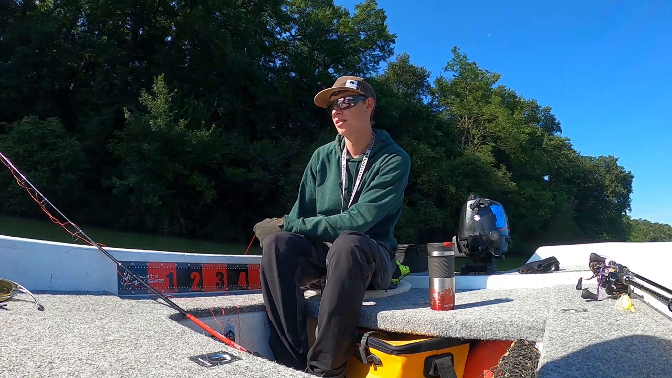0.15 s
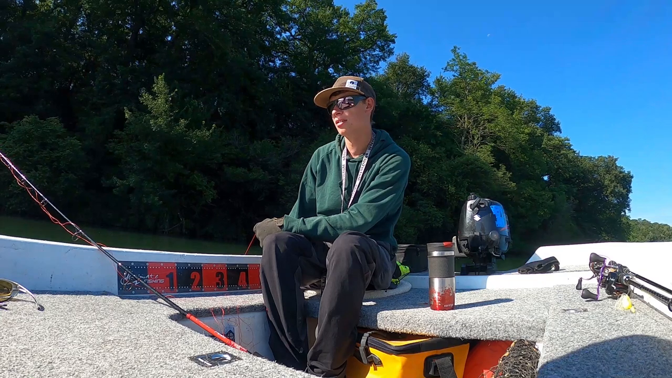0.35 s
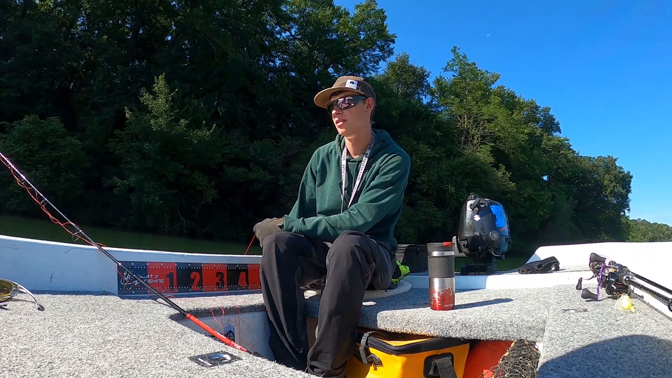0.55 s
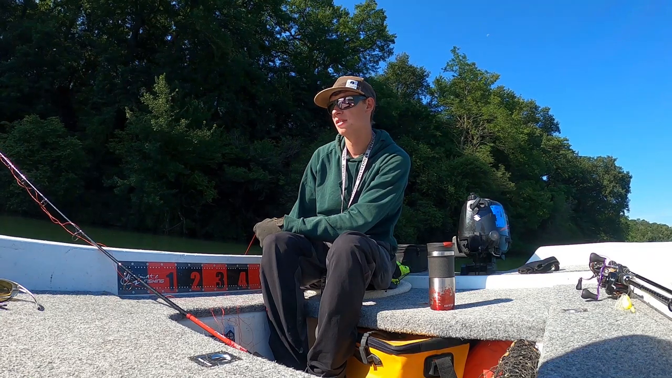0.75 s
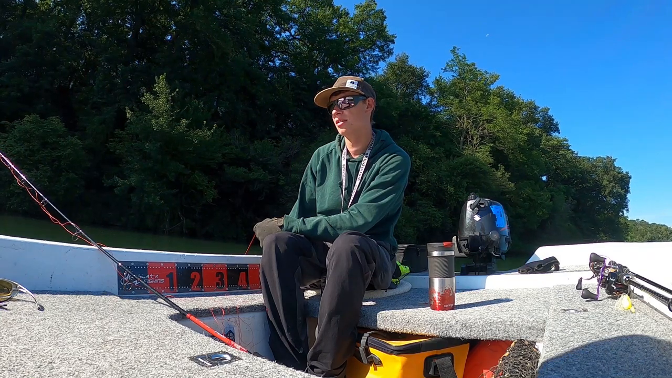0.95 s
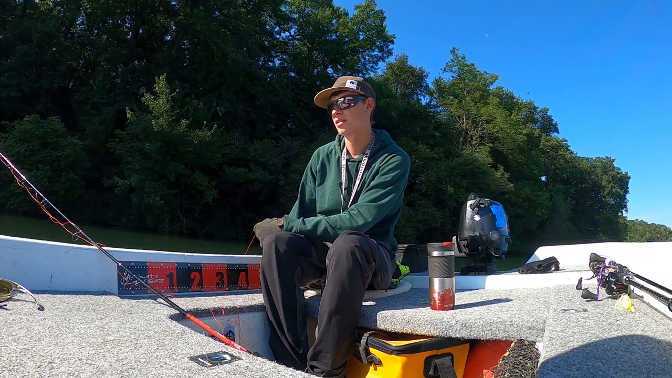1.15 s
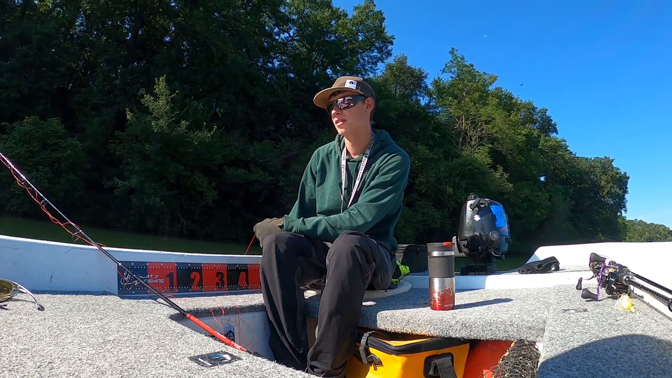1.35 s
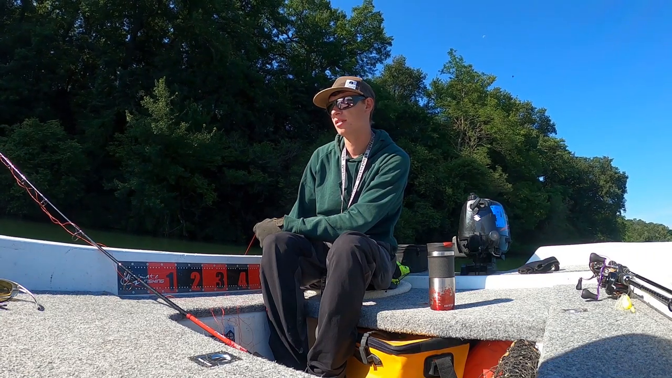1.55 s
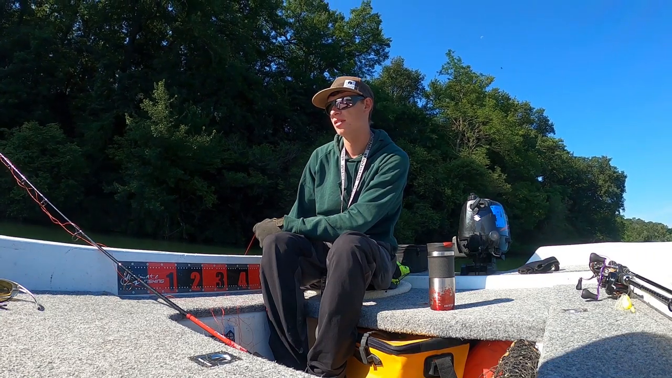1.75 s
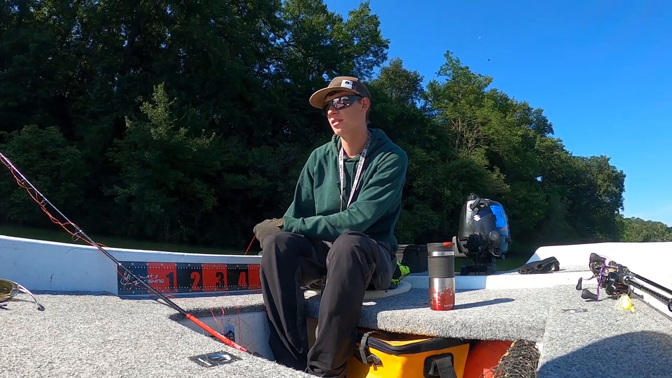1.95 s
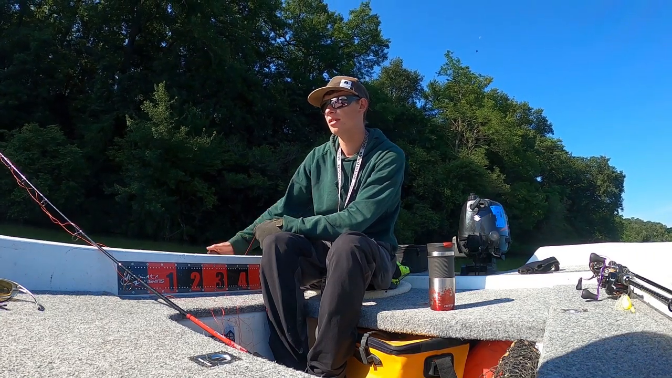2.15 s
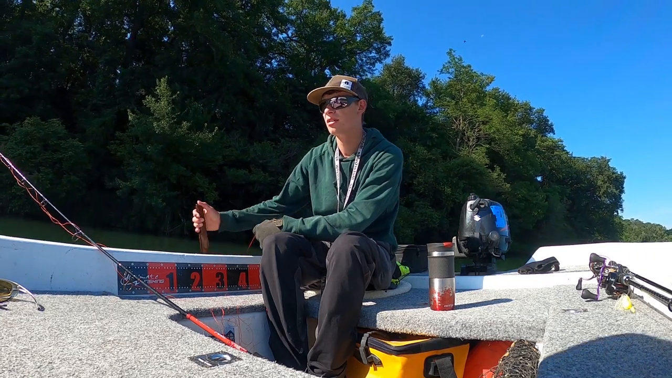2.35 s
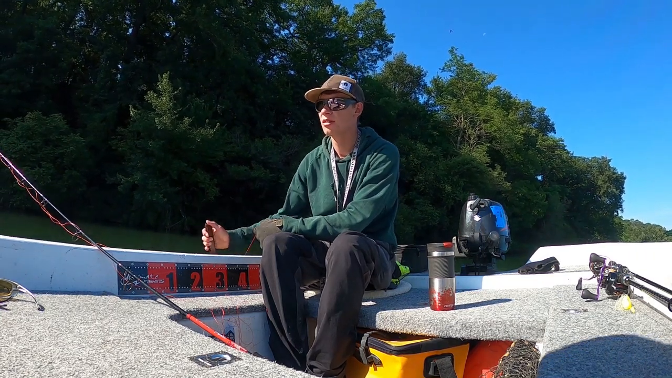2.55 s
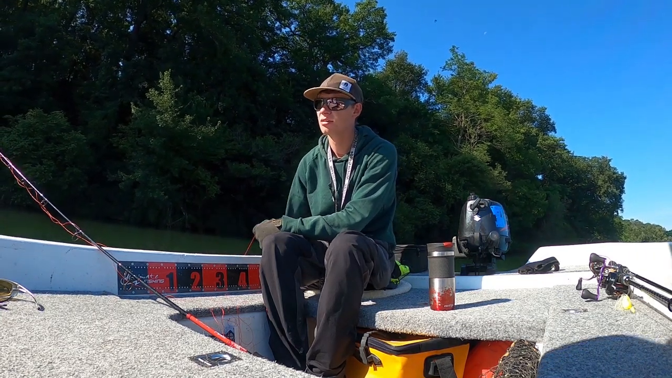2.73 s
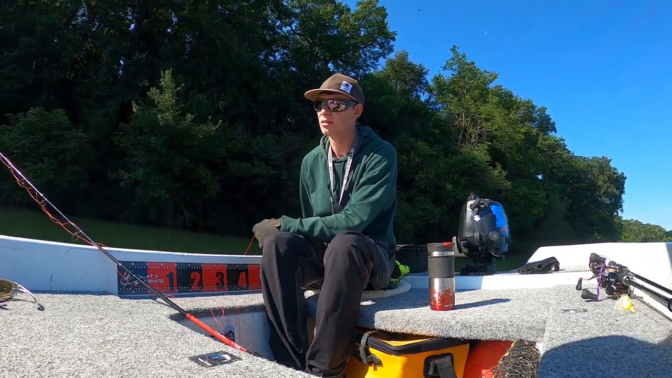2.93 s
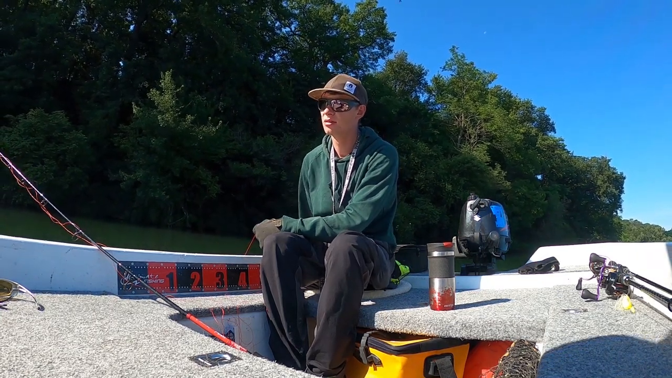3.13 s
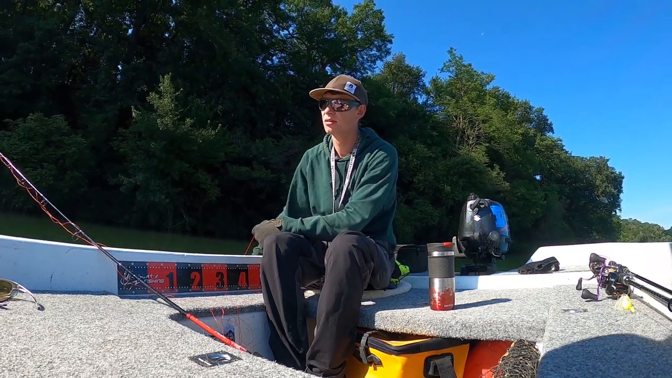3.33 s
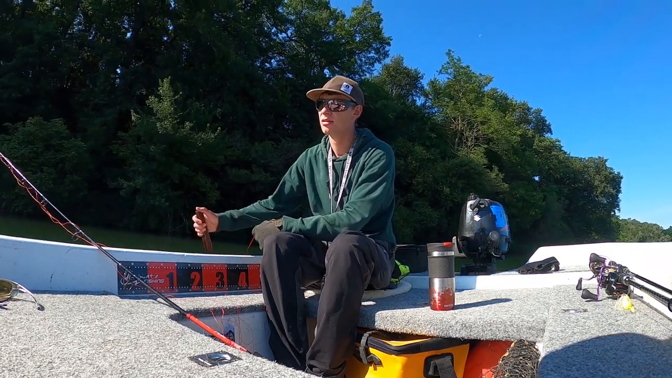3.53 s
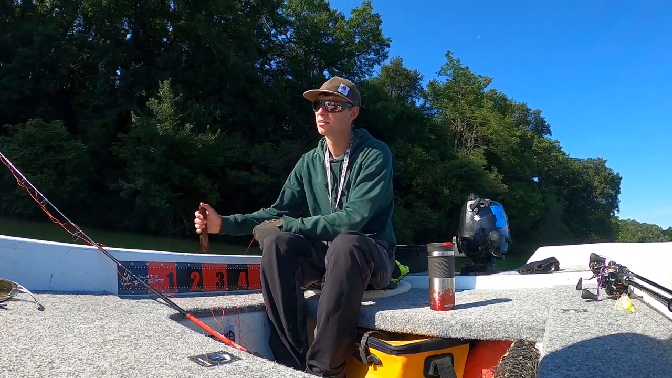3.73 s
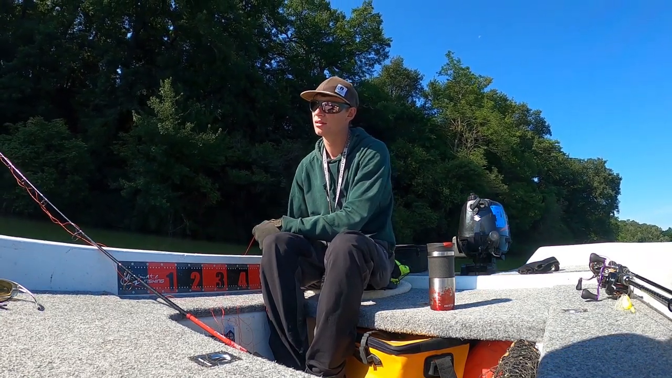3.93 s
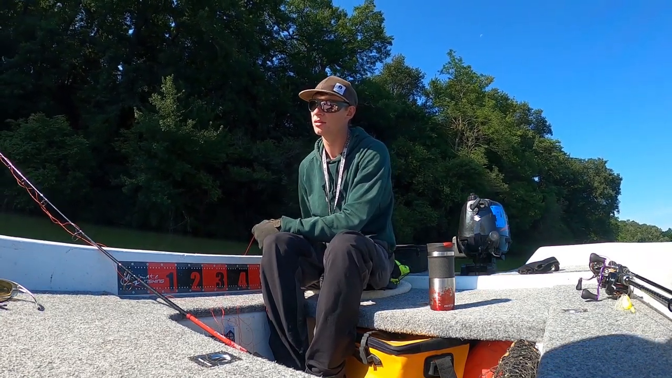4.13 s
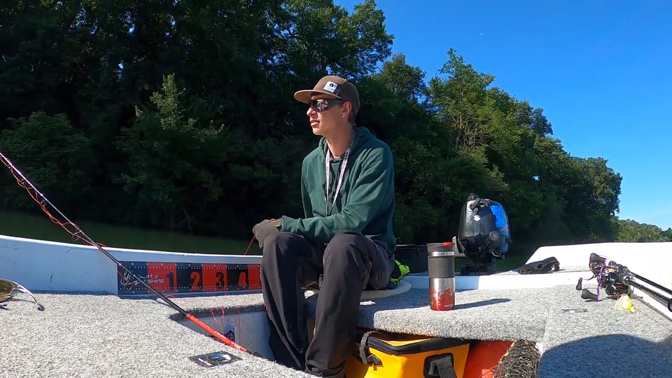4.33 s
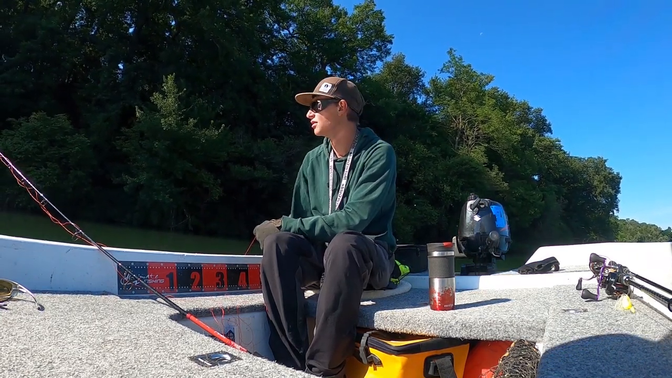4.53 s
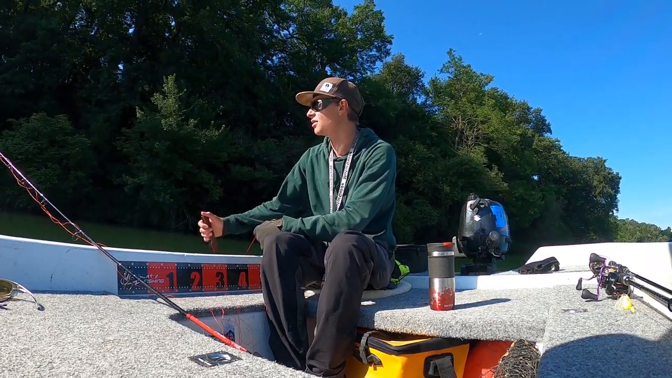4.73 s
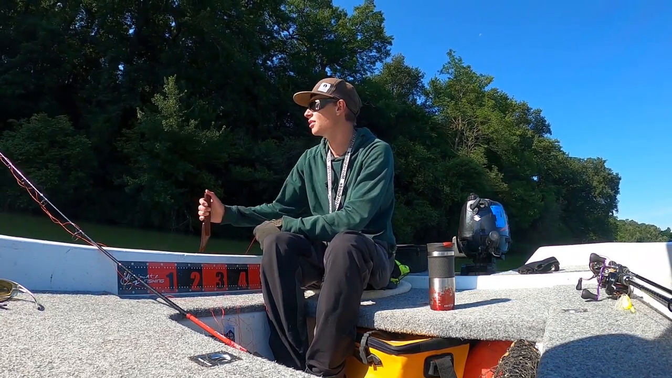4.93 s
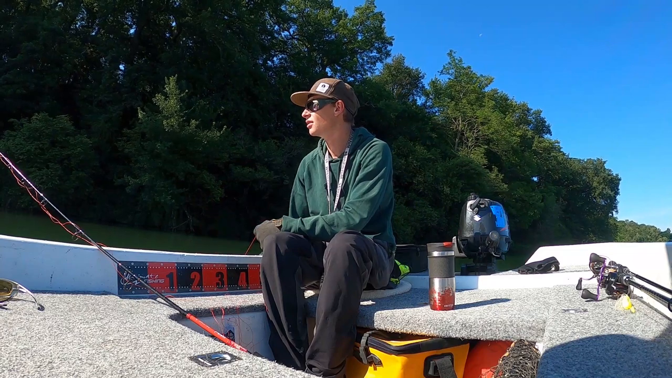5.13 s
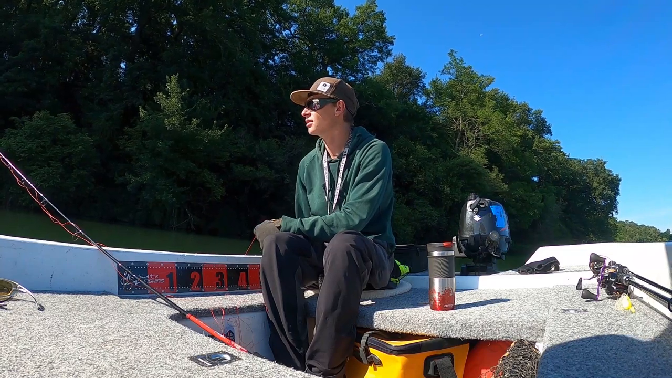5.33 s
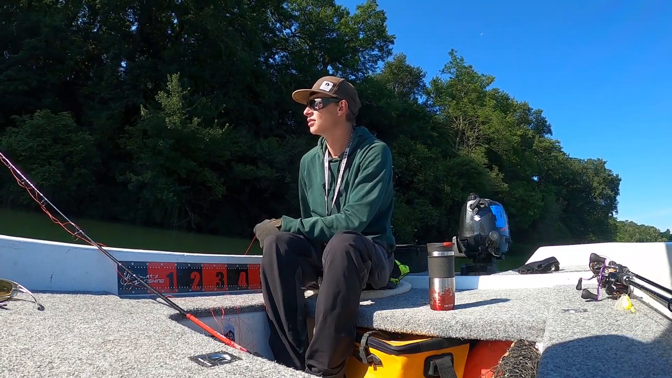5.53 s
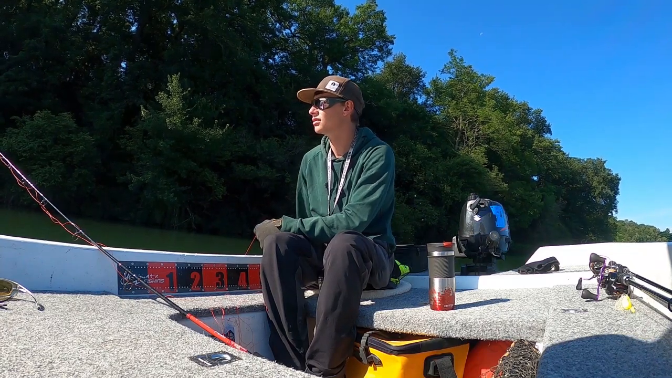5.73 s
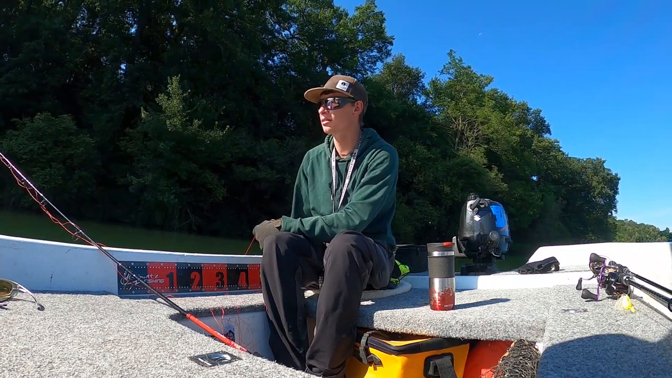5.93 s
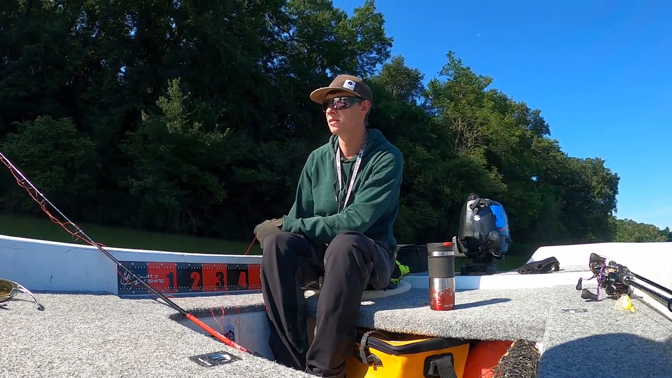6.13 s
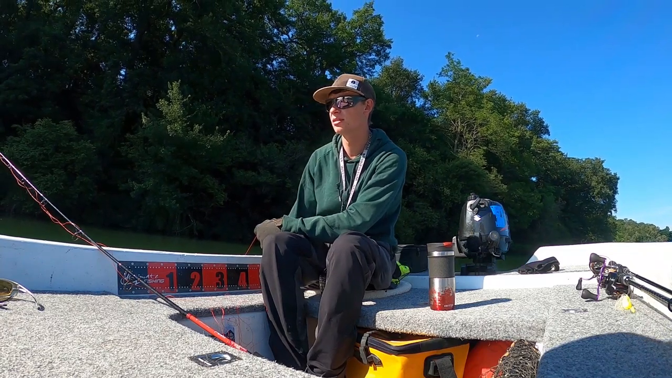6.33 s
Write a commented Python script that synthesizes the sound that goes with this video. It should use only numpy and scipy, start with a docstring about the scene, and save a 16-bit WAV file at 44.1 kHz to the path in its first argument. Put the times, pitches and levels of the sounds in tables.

```python
"""A wooden clonk, a stick that plops in water, is plunged three times into a calm river from a boat.
Each stroke splashes, drags down a throbbing pocket of air and pinches it off with a deep rising plop;
then the water falls back in gurgles and drops, and the wooded bank echoes.
Before that, the clonk bumps the boat and a sleeve swishes as the arm reaches out.
Small birds call over a low outdoor rumble."""
import sys
import numpy as np
from scipy import signal
from scipy.fft import rfft, irfft, next_fast_len
from scipy.io import wavfile

SR = 44100
rng = np.random.default_rng(int(sys.argv[2]) if len(sys.argv) > 2 else 0)


def output_pcm(signal):
    """Save a mono or channel-first signal as 16-bit PCM at the path in sys.argv[1].

    Samples are clipped to [-1, 1] before scaling.
    """
    pcm = np.clip(np.atleast_2d(signal).T, -1, 1) * 32767
    wavfile.write(sys.argv[1], SR, np.round(pcm).astype(np.int16))


N = 285762
TIME = np.arange(N) / SR


def from_db(db):
    """Turn decibels into a gain to multiply by."""
    return 10 ** (np.asarray(db) / 20)


def rms_one(x):
    """Scale a signal so that its average strength (rms) is 1."""
    return x / np.sqrt(np.mean(x ** 2) + 1e-20)


def at_hz(points, hz):
    """Read between the rows of a table, along a scale of octaves."""
    points = np.array(points)
    return np.interp(np.log(hz), np.log(points[:, 0]), points[:, 1])


def level(rows):
    """A gain that follows rows of time_s, level_db."""
    return from_db(np.interp(TIME, *np.transpose(rows)))


def since(s):
    """Seconds since a moment, zero before it."""
    return np.maximum(TIME - s, 0)


def dying(age, t60):
    """A fade that loses 60 dB every t60 seconds."""
    return from_db(-60 * np.minimum(age / t60, 4))


def burst(s, length, t60):
    """A quick rise, a hold and a fade."""
    return np.minimum(since(s) / 0.0013, 1) * dying(since(s + length), t60)


def swell(s, rise, length, t60):
    """A rounded rise, a hold and a fade."""
    return np.sin(np.pi / 2 * np.minimum(since(s) / rise, 1)) ** 2 * dying(since(s + length), t60)


def arch(length):
    """Progress through a note from 0 to 1, and its rounded loudness."""
    progress = np.linspace(0, 1, int(length * SR))
    return progress, np.sqrt(4 * progress * (1 - progress))


def sine(hz):
    """A pure tone that follows a pitch curve."""
    return np.sin(2 * np.pi * np.cumsum(hz) / SR)


def drift(per_s):
    """A random wander, about 1 in size."""
    knots = rng.standard_normal(int(N / SR * per_s) + 2)
    return rms_one(np.interp(TIME * per_s, np.arange(len(knots)), knots))


def clicks(per_s, size_db):
    """Random clicks of uneven size."""
    sizes = from_db(size_db * np.minimum(rng.exponential(1, N), 4)) * rng.choice([-1, 1], N)
    return sizes * (rng.random(N) < per_s / SR)


def add(out, s, sound):
    """Mix a short sound in at a moment."""
    start = max(int(s * SR), 0)
    out[..., start:start + sound.shape[-1]] += sound[..., :max(N - start, 0)]


def coloured(x, colour):
    """Give a sound a tone colour: rows of pitch_hz, relative_db. The result has rms 1."""
    size = 2 * next_fast_len(N // 2 + SR // 4)
    hz = np.maximum(np.arange(size // 2 + 1) * SR / size, 1)
    octaves_outside = abs(np.log2(hz / np.clip(hz, colour[0][0], colour[-1][0])))
    gain = from_db(at_hz(colour, hz) - np.minimum(30 * octaves_outside, 60))
    # Folding the cepstrum keeps the filter from ringing before the sound arrives.
    cepstrum = irfft(np.log(gain))
    cepstrum[1:size // 2] *= 2
    cepstrum[size // 2 + 1:] = 0
    return rms_one(irfft(rfft(x, size) * np.exp(rfft(cepstrum)))[..., :N])


def pan(left_db):
    """Two gains that make the left side left_db louder than the right."""
    return from_db(np.array([[left_db], [-left_db]]) / 2)


def spread(mid, side, alike):
    """Mix two unrelated signals into left and right, alike from 0 (not at all) to 1 (the same)."""
    alike = np.clip(alike, 0, 1)
    return np.sqrt(1 + alike) * mid + np.sqrt(1 - alike) * side * np.array([[1], [-1]])


def delay_left(pair, lag_s):
    """Direct sound reaches the left microphone a moment later."""
    size = next_fast_len(N + 64)
    hz = SR * np.arange(size // 2 + 1) / size
    late = irfft(rfft(pair[0], size) * np.exp(-2j * np.pi * lag_s * hz), size)
    return np.array([late[:N], pair[1]])


def woods_echo(x, t60, build_s):
    """Sound scatters off many trunks and leaves: a stereo tail that builds up, then dies."""
    age = TIME[:int(1.5 * SR)]
    response = rng.standard_normal((2, len(age))) * dying(age, t60) * (1 - np.exp(-age / build_s))
    return signal.fftconvolve(x[None], rms_one(response) / np.sqrt(len(age)), axes=1)[:, :N]


# How alike left and right are in sound from all around: pitch_hz, alike_0_to_1
EAR_LIKENESS = [(30, 1), (200, 0.85), (600, 0), (1500, 0.2), (4000, 0), (12000, 0.1)]
def wide_noise(colour):
    """Coloured noise from all around, with left and right alike only in the bass."""
    size = next_fast_len(N)
    mid, side = rfft(rng.standard_normal((2, size)))
    alike = at_hz(EAR_LIKENESS, np.linspace(1, SR / 2, len(mid)))
    return coloured(irfft(spread(mid, side, alike), size)[:, :N], colour)


# Loudness of the rumble before its boost: time_s, level_db
RUMBLE_LEVELS = [(0, -55), (1.1, -56), (1.55, -53), (2.1, -55), (3.7, -58.5), (6.48, -57.5)]
# Tone of the rumble: pitch_hz, relative_db
RUMBLE_TONE = [(18, -26), (30, -4), (75, 0.5), (86, -0.5), (112, -9), (134, -6), (177, -5.5), (222, -11),
               (253, -19.5), (294, -22.5), (419, -32), (450, -32), (500, -32.5), (650, -64.5), (1100, -120)]
def rumble(boost_db=3.0, wander_db=1.66):
    """A low, slightly uneven outdoor rumble."""
    return level(RUMBLE_LEVELS) * from_db(boost_db + wander_db * drift(16)) * wide_noise(RUMBLE_TONE)


# Loudness of the hiss: time_s, level_db
AIR_LEVELS = [(0, -71), (.9, -72.5), (1.6, -68.5), (3.7, -71), (5.2, -72.5), (6.1, -68), (6.48, -72)]
# Tone of the hiss: pitch_hz, relative_db
AIR_TONE = [(210, -25), (350, -4), (756, -8), (845, -11.5), (1210, -6.5), (1800, -13.5), (2540, -11),
            (4230, -18.5), (4780, -17.5), (6040, -18.5), (7640, -23), (8650, -40), (9390, -29),
            (12200, -62), (20700, -120)]
def air():
    """The open air hisses faintly."""
    return level(AIR_LEVELS) * wide_noise(AIR_TONE)


# Tone of the ripples: pitch_hz, relative_db
RIPPLE_TONE = [(2500, -11), (4000, -2), (6800, -2.5), (8500, -13.5)]
def ripples(per_s=3, level_db=-90.5):
    """Ripples tick against the hull in tiny puffs of noise."""
    puffs = signal.oaconvolve(clicks(per_s, size_db=2), dying(TIME[:SR // 20], t60=.025))[:N]
    return from_db(level_db) * rms_one(puffs * wide_noise(RIPPLE_TONE))


# Tone of the far birds: pitch_hz, relative_db
CHORUS_TONE = [(6000, -21.5), (6900, -7), (7650, 0), (8200, -11.5), (9200, -21.5)]
def far_chorus(level_db=-83, wander_db=2.5):
    """Far birds in the treetops blend into a high, wavering band of noise."""
    return from_db(level_db + wander_db * drift(5.3)) * wide_noise(CHORUS_TONE)


# Bird trills: start_s, length_s, start_hz, end_hz, level_db, warbles_per_s, hidden_0_to_1, left_db
BIRD_TRILLS = [(.675, .09, 7650, 7350, -62.5, 60, .9, 0), (3.578, .08, 7950, 7250, -54, 43, .1, 4),
               (3.776, .115, 8300, 7650, -41, 58, .15, -5), (4.238, .088, 8000, 7450, -47, 47, .15, 2),
               (4.654, .078, 7850, 7150, -46, 44, .1, 5), (4.780, .06, 8150, 7750, -49, 50, .1, -1),
               (4.74, .16, 6650, 6250, -63, 55, .95, 0), (4.975, .10, 7700, 7550, -54, 65, .9, 2),
               (5.13, .135, 7450, 6900, -50, 60, .85, 3), (5.325, .11, 7250, 7150, -53, 55, .8, 2),
               (6.16, .22, 7050, 6750, -64, 30, .85, 0)]
def trills(warble_hz=1150, peak_dip_db=-16, trim_db=-0.76):
    """Thin, falling, warbling calls: returns the part in the open and the part hidden by trees."""
    clear, hidden = np.zeros((2, N)), np.zeros(N)
    for s, length, start_hz, end_hz, db, per_s, hidden_share, left_db in BIRD_TRILLS:
        progress, loudness = arch(length)
        age = length * progress
        warble = 1 - abs(np.cos(np.pi * per_s * (age - .004)))  # loud low turns, faint sharp peaks
        hz = start_hz + (end_hz - start_hz) * progress + warble_hz * (warble - np.exp(-age / .005))
        call = from_db(db + trim_db + peak_dip_db * warble) * loudness ** 2 * sine(hz)
        add(clear, s, np.sqrt(1 - hidden_share) * call * pan(left_db))
        add(hidden, s, np.sqrt(hidden_share) * call)
    return clear, hidden


def sing(out, s, hz, gain, wobble, wobble_hz=45):
    """Mix in one bird note with a slightly unsteady pitch."""
    add(out, s, gain * sine(hz + wobble_hz * wobble[int(s * SR):][:len(hz)]))


# Short chirps: start_s, length_s, top_hz, rise_s, level_db, left_db, second_voice_db
BIRD_CHIRPS = [(0.107, .05, 8000, 0.018, -68, 0, -6), (0.287, 0.039, 7830, .010, -64, -3, -4),
               (0.396, 0.048, 7930, 0.013, -63, -4, -2), (1.13, .055, 6280, 0.0095, -65.5, -17, -27),
               (2.920, .048, 8800, .007, -50, -12, -33.5), (3.035, 0.035, 8820, 0.0088, -49, -2, -32),
               (5.89, 0.044, 8100, .007, -71, 0, -32)]
def chirps(wobble, sweep_share=.5, sag_hz_per_s=24000, second_voice_ratio=.8):
    """A bird's two voices shoot up toward a top pitch together, then sag."""
    out = np.zeros((2, N))
    for s, length, top_hz, rise, db, left_db, second_db in BIRD_CHIRPS:
        progress, loudness = arch(length)
        age = length * progress
        hz = top_hz * (1 - sweep_share * np.exp(-age / rise)) - sag_hz_per_s * age
        gain = from_db(db) * loudness ** 2 * pan(left_db)
        sing(out, s, hz, gain, wobble)
        sing(out, s, second_voice_ratio * hz, from_db(second_db) * gain, wobble)
    return out


# Falling whistles: start_s, length_s, start_hz, end_hz, level_db
BIRD_WHISTLES = [(1.965, 0.15, 7650, 6310, -50), (2.176, 0.087, 7650, 6010, -46),
                 (2.365, .072, 7000, 5900, -51)]
def whistles(wobble):
    """A bird whistles notes that slide straight down."""
    out = np.zeros(N)
    for s, length, start_hz, end_hz, db in BIRD_WHISTLES:
        progress, loudness = arch(length)
        sing(out, s, start_hz + (end_hz - start_hz) * progress, from_db(db) * loudness ** 2, wobble)
    return out


# Far songs: start_s, note_count, beat_s, top_hz, climb_hz, arch_hz, rasp_hz, level_db, undertone_db
BIRD_SONGS = [(1.202, 5, .046, 3750, 0, 300, 190, -67, -30), (1.525, 5, .083, 5500, 30, 500, 250, -64, -9),
              (4.685, 6, .111, 2420, 62, 400, 14, -70.5, -30)]
def songs(wobble, note_share=.68, boost_db=0.6):
    """Far birds repeat one up-and-down note evenly, with a softer tone an octave below."""
    out = np.zeros(N)
    for first, count, beat, top_hz, climb_hz, arch_hz, rasp_hz, db, under_db in BIRD_SONGS:
        progress, loudness = arch(note_share * beat)
        gain = from_db(db + boost_db) * loudness
        for note in range(count):
            s = first + beat * note
            hz = top_hz + climb_hz * note - arch_hz * (2 * progress - 1) ** 2
            sing(out, s, hz, gain, wobble, rasp_hz)
            sing(out, s, hz / 2, from_db(under_db) * gain, wobble, rasp_hz / 2)
    return out


def birds(direct_db=-5.0, blur_db=-6, woods_db=-10):
    """Some birdsong arrives straight; the rest is blurred by leaves and rings on in the woods."""
    clear, hidden = trills()
    wobble = drift(700)
    calls = chirps(wobble) + whistles(wobble) + songs(wobble)
    direct = delay_left(clear + from_db(direct_db) * calls, lag_s=.000012)
    blurred = woods_echo(hidden + from_db(blur_db) * calls.mean(axis=0), t60=0.12, build_s=0.0012)
    ringing = woods_echo(hidden + (clear + calls).mean(axis=0), t60=.55, build_s=.008)
    return direct + blurred + from_db(woods_db) * ringing


# Arm movements: start_s, rise_s, length_s, level_db
SLEEVE_SWISHES = [(1.95, 0.19, 0.6, -59), (2.603, 0.15, 0.27, -61)]
# Tone of the cloth: pitch_hz, relative_db
SLEEVE_TONE = [(600, -11), (1100, -4.5), (1700, 2.5), (2300, -5.5), (3300, -6), (4600, -1.5), (6000, -7.5),
               (7300, -2), (8300, -11.5), (10500, -19.5), (14000, -29)]
def sleeve(t60=0.39, rub_db=0.5):
    """A sleeve rubs and swishes as the arm reaches out and lifts the clonk."""
    motion = sum(from_db(db) * swell(s, rise, length, t60) for s, rise, length, db in SLEEVE_SWISHES)
    return motion * from_db(rub_db * drift(45)) * wide_noise(SLEEVE_TONE) * pan(7.9)


# Bumps on the boat: start_s, length_s, knock_db, thud_db
BOAT_KNOCKS = [(1.73, 0.016, -60, -47.5), (1.764, 0.012, -56, -59), (1.847, 0.0013, -48.5, -46.5),
               (2.012, 0.011, -58, -44.5)]
# Tone of a knock: pitch_hz, relative_db
KNOCK_TONE = [(300, 8), (600, -12), (1050, 7.5), (2000, -2), (3000, -7), (5500, -8), (9000, -32),
              (13000, -49)]
def knocks(knock_t60=0.064, thud_t60=0.13):
    """The clonk bumps the boat as it is picked up: soft knocks over low thuds."""
    knock = sum(from_db(db) * burst(s, length, knock_t60) for s, length, db, _ in BOAT_KNOCKS)
    thud = sum(from_db(db) * burst(s, length, thud_t60) for s, length, _, db in BOAT_KNOCKS)
    thud_tone = [(90, -1.5), (180, -10.5), (350, -23.5), (700, -20.5)]
    return knock * wide_noise(KNOCK_TONE) * pan(7.5) + thud * wide_noise(thud_tone)


def bank_ring(plop, level_db=-65, delay_s=0.063):
    """The top of each plop comes back from the wooded bank as a soft, lingering ring."""
    late = np.interp(TIME - delay_s, TIME, plop, left=0)
    ring_tone = [(200, -35.5), (255, -8.5), (295, 0), (335, -2.5), (450, -19.5)]
    tail = coloured(woods_echo(late, t60=0.78, build_s=.1), ring_tone)
    return from_db(level_db) * spread(*tail, alike=.9)


# Echoes off the bank: delay_s, level_db
BANK_ECHOES = [(0.022, -45.5), (0.143, -42), (.225, -49.5)]
# Tone of the boom of hull and bank: pitch_hz, relative_db
BOOM_TONE = [(22, -17.5), (34, 15), (55, 8.5), (80, -5), (130, -9), (200, -12), (260, -16.5), (320, -13),
             (420, -24), (700, -37)]
def boom(plop, far_db=-50, near_db=-50):
    """Hull and rocking water answer each plop with a low boom; the bank sends back a few echoes."""
    tail = coloured(woods_echo(plop, t60=1.0, build_s=0.0067), BOOM_TONE)
    far = from_db(far_db) * spread(*tail, alike=0.94)
    rocking = sum(burst(pinch, length=0.01, t60=0.69) for pinch in PINCH_TIMES_S)
    near_tone = [(28, -4.5), (70, -12.0), (130, -5.5), (250, -11), (450, -27)]
    near = from_db(near_db) * rms_one(rocking) * coloured(rng.standard_normal(N), near_tone)
    echoes = sum(from_db(db) * np.interp(TIME - delay, TIME, plop, left=0) for delay, db in BANK_ECHOES)
    return (far + near + echoes) * pan(-0.67)


def bubble(hz, t60, rise):
    """A small bubble rings and rises in pitch as it dies."""
    age = np.arange(int(t60 * SR) + 2) / SR
    return sine(hz * (1 + rise * age / t60)) * dying(age, t60)


def bubble_cloud(pitches, cycles):
    """Bubbles are born at random; each swells softly and rings for some cycles at one of the pitches."""
    out = np.zeros(N)
    for hz in pitches:
        ring = bubble(hz, cycles / hz, rise=.15)
        fade_in = 1 - np.exp(-TIME[:len(ring)] * hz / 1.5)
        out += signal.oaconvolve(clicks(per_s=45, size_db=1.8), ring * fade_in * hz)[:N]
    return rms_one(out)


def stray_droplets(per_s=20, level_db=-53, range_db=8, low_hz=800, high_hz=3000, cycles=50):
    """Droplets land at random while the spray falls: returns rows like those of BIG_DROPS."""
    rows = []
    for (*_, spray_s, _), pinch in zip(STROKE_SPLASHES, PINCH_TIMES_S):
        for wait, size, pitch in rng.random((int(per_s * spray_s), 3)):
            hz = low_hz * (high_hz / low_hz) ** pitch
            rows.append((pinch + wait * spray_s, level_db + range_db * (size - .5), hz, cycles / hz))
    return rows


# The larger drops and bubbles: start_s, level_db, pitch_hz, fade_s
BIG_DROPS = [(2.656, -35, 1670, 0.01), (2.706, -40.5, 1680, 0.011), (2.75, -44.5, 1680, 0.0093),
             (2.775, -41, 1640, 0.0075), (2.883, -28.5, 1480, 0.014), (2.99, -47.5, 541, 0.1),
             (3.112, -50, 454, 0.18), (3.163, -50, 1160, .035), (3.276, -56, 2448, .02),
             (3.442, -55, 6475, 0.017), (3.531, -56, 1580, 0.019), (4.118, -34.5, 800, 0.042),
             (4.157, -35.5, 745, 0.029), (4.229, -45, 905, 0.085), (4.393, -41, 640, 0.065),
             (4.395, -37, 1030, 0.033), (4.496, -48, 1100, 0.044), (4.57, -55, 1054, .04),
             (4.678, -56.5, 3120, 0.0047), (4.86, -54, 1600, 0.026), (5.429, -47, 2200, 0.027),
             (5.482, -46, 970, 0.077), (5.579, -45.5, 993, 0.058), (5.615, -53, 1560, 0.071),
             (5.734, -50, 2000, 0.025), (5.809, -52, 2317, 0.038), (5.922, -48, 3890, 0.017)]
def drops(tick_db=-9, tick_t60=0.019):
    """Each drop ticks on the surface and leaves a ringing bubble."""
    rings, ticks = np.zeros((2, N))
    tick_tone = [(900, -2.0), (2400, 8.5), (4000, -18), (8000, -17.0), (12000, -30.5)]
    spatter = coloured(rng.standard_normal(N), tick_tone)
    for s, db, hz, t60 in BIG_DROPS + stray_droplets():
        add(rings, s, from_db(db) * bubble(hz, t60, rise=.12))
        add(ticks, s, from_db(db + tick_db) * dying(TIME[:SR // 20], tick_t60))
    return rings + ticks * spatter


# Tone of the gurgle: pitch_hz, relative_db
GURGLE_TONE = [(210, -29.5), (350, 9.5), (441, 2), (505, -3), (624, -0.5), (841, -7), (1010, 1), (1250, -4),
               (1640, -4), (3500, -23), (4550, -63.5), (7700, -120)]
# Tone of the spray: pitch_hz, relative_db
SPRAY_TONE = [(2000, -16.5), (3000, 7), (4500, 1.5), (6500, -2.5), (8000, -4), (10000, -15), (14000, -36.5)]
def falling_water(collapse_db=-41, rebound_after_s=.165, flicker_db=1.5):
    """The hole collapses and its rebound falls back gurgling, while spray lands in tiny ringing drops."""
    churning, spraying = np.zeros((2, N))
    for (*_, rebound_db, spray_s, spray_db), pinch in zip(STROKE_SPLASHES, PINCH_TIMES_S):
        churning += from_db(collapse_db) * burst(pinch, length=0, t60=0.38)
        churning += from_db(rebound_db) * swell(pinch + rebound_after_s, rise=.02, length=.14, t60=.85)
        spraying += from_db(spray_db) * swell(pinch, rise=.02, length=spray_s, t60=.6)
    froth = rms_one(spread(*rng.standard_normal((2, N)), alike=.7))
    gurgle = coloured(bubble_cloud(np.geomspace(450, 3200, 16), cycles=28) + .8 * froth, GURGLE_TONE)
    spray = coloured(bubble_cloud(np.geomspace(2700, 8000, 8), cycles=56) + 2.4 * froth, SPRAY_TONE)
    return from_db(flicker_db * drift(35)) * (churning * gurgle + spraying * spray)


# One splash per stroke: under_s, graze_s, crack_db, tear_db, closing_db, rebound_db, spray_s, spray_db
STROKE_SPLASHES = [(2.849, .001, -33.5, -43, -37, -60.5, 0.44, -68),
                   (4.1315, .018, -32, -42, -43, -58.5, 0.32, -68.5),
                   (5.362, .0015, -37.5, -37.5, -43, -61.5, .47, -68)]
# Tone of a splash: pitch_hz, relative_db
SPLASH_TONE = [(330, -6.5), (480, 6.5), (620, -9.5), (850, 7), (1100, -7), (1380, 5), (1600, -3),
               (2330, -1.5), (3200, -8.5), (4200, -12.5), (6150, -21), (7500, -19.5), (10000, -33),
               (14000, -49.5)]
def splashes(closing_s=0.0091, t60=.048):
    """The head of the clonk breaks the water in five quick steps, each a dense crackle."""
    power = np.zeros(N)
    for (under, graze, crack_db, tear_db, closing_db, *_), pinch in zip(STROKE_SPLASHES, PINCH_TIMES_S):
        # start_s, length_s, level_db
        steps = [(under - graze, graze, -47),  # the head skims the surface
                 (under, 0.0048, crack_db),  # cracks through it
                 (under, pinch - under, tear_db),  # and tears it open
                 (pinch - closing_s, closing_s, closing_db),  # the pocket's walls slap together
                 (pinch + .036, .008, -50)]  # the big bubble bursts
        power += sum((from_db(db) * burst(s, length, t60)) ** 2 for s, length, db in steps)
    mid, side = (clicks(per_s=2200, size_db=0.5) for _ in range(2))
    return np.sqrt(power) * coloured(spread(mid, side, alike=0.75), SPLASH_TONE)


# The three strokes:
# entry_s, slap_db, pocket_hz, pocket_db, pinch_s, start_hz, end_hz, rise_s, bubble_db, fade_s
CLONK_STROKES = [(2.8535, -11.5, 74.4, -9, 2.8856, 168.8, 318.5, .0194, -0.36, 0.15),
                 (4.1332, -48, 76.4, -9.5, 4.1584, 101.7, 320, 0.01, 3.5, 0.071),
                 (5.367, -30, 77.1, -10, 5.3988, 145, 335.5, 0.012, 3, 0.078)]
PINCH_TIMES_S = [stroke[4] for stroke in CLONK_STROKES]
def plops(slap_hz=220, slap_t60=0.046, pocket_t60=0.1, surfacing_s=0.063):
    """The open air pocket throbs; once pinched off it rings higher, rising as it nears the surface."""
    slaps, pockets, bubbles = np.zeros((3, N))
    for stroke in CLONK_STROKES:
        entry, slap_db, pocket_hz, pocket_db, pinch, start_hz, end_hz, rise, bubble_db, t60 = stroke
        touched, opened, closed = since(entry - .002), since(entry), since(pinch)
        # A flat landing slaps the water.
        slaps -= from_db(slap_db) * dying(touched, slap_t60) * sine(slap_hz * (touched > 0))
        depth = np.minimum(opened / (pinch - entry), 1) ** .4
        throb = sine(pocket_hz * (opened > 0) * (1 + 3.6 * opened))
        pockets -= from_db(pocket_db) * depth * dying(closed, pocket_t60) * throb
        sealed = 1 - np.exp(-(closed / .005) ** 2)
        hz = end_hz + (start_hz - end_hz) * np.exp(-closed / rise)
        submerged = np.exp(-np.minimum(closed / surfacing_s, 2) ** 4)  # surfacing ends the ring
        bubbles -= from_db(bubble_db) * sealed * submerged * dying(closed, t60) * sine(hz * (closed > 0))
    return pockets * pan(-.1) + (slaps + bubbles) * pan(1.7)


def scene(bank_db=-20):
    """Plops and splashes beside the boat, their faint return from the bank, and the riverside around."""
    plop, splash = plops(), splashes()
    centre = plop.mean(axis=0)
    deep_water = plop + boom(centre) + bank_ring(centre)
    surface = (splash + falling_water() + drops()) * pan(1.0)
    water = delay_left(deep_water + surface, lag_s=.00003)
    bank = from_db(bank_db) * woods_echo(splash[0], t60=.9, build_s=.02)
    return water + bank + sleeve() + knocks() + birds() + rumble() + far_chorus() + ripples() + air()


def record(dry, bass_hz=32, bass_foot_hz=9, bright_band_hz=(1600, 4000), lean=0.081, cutoff_hz=14200):
    """The left microphone has less deep bass and is brighter, the right is duller; the top is cut."""
    bass_dip = signal.bilinear([1, 2 * np.pi * bass_foot_hz], [1, 2 * np.pi * bass_hz], fs=SR)
    pair = np.array([signal.lfilter(*bass_dip, dry[0]), dry[1]])
    brightness = signal.sosfilt(signal.butter(1, bright_band_hz, "band", fs=SR, output="sos"), pair)
    pair = pair + lean * brightness * np.array([[1], [-1]])
    return signal.sosfilt(signal.cheby2(12, 70, cutoff_hz, fs=SR, output="sos"), pair)


dry = scene()
out = record(dry)
output_pcm(out)
```